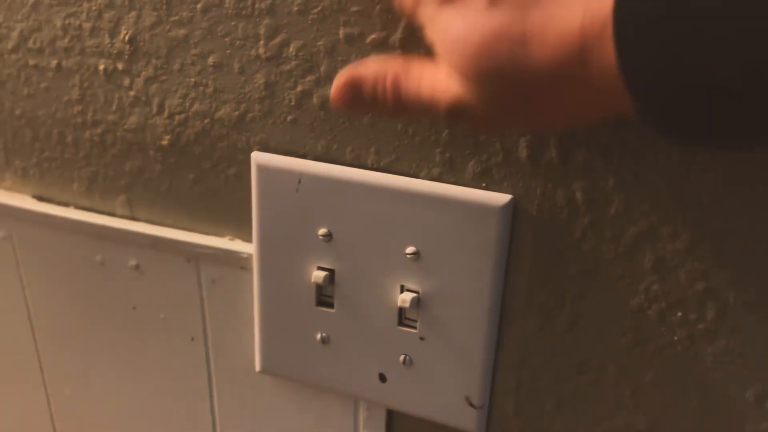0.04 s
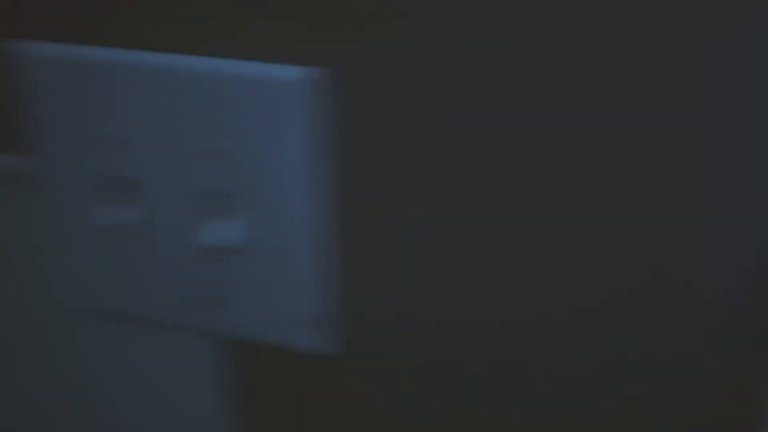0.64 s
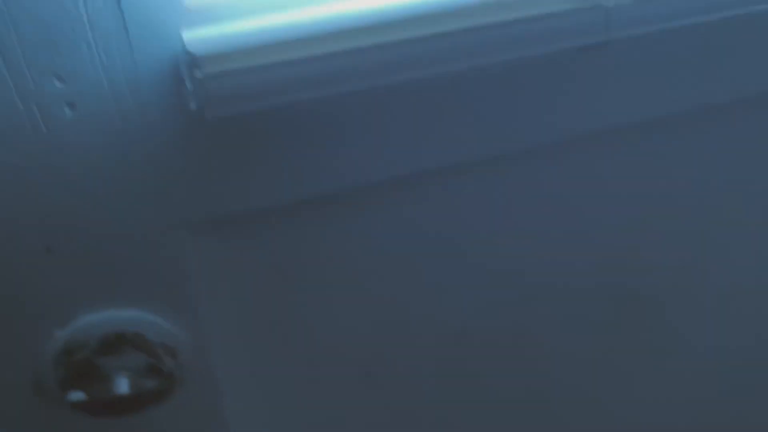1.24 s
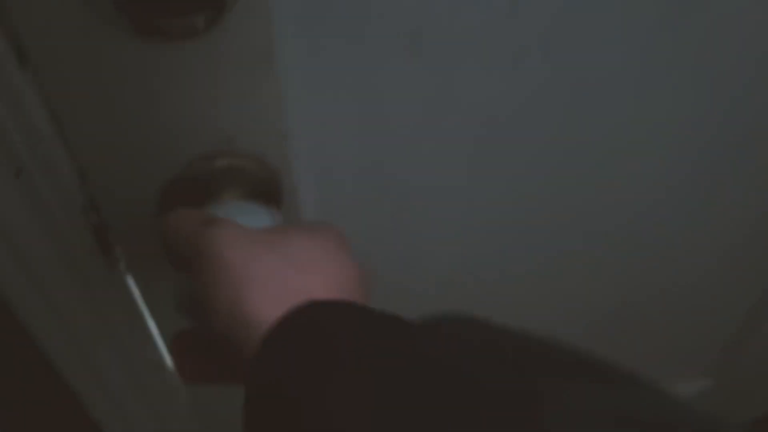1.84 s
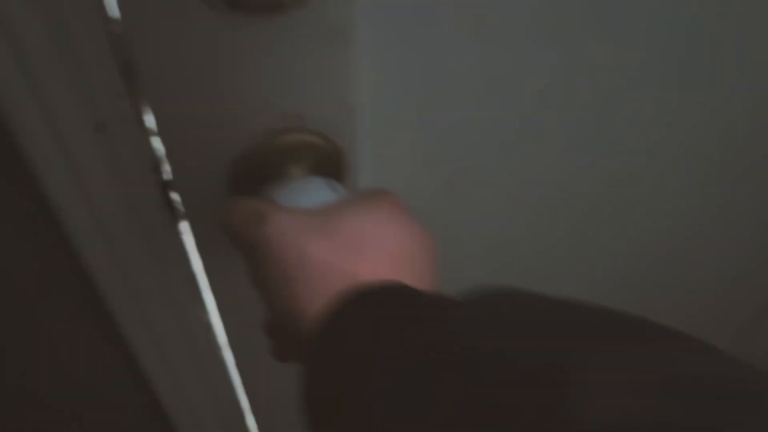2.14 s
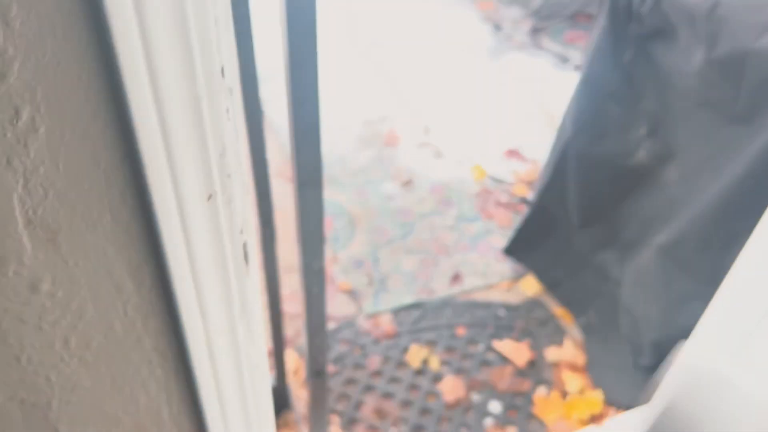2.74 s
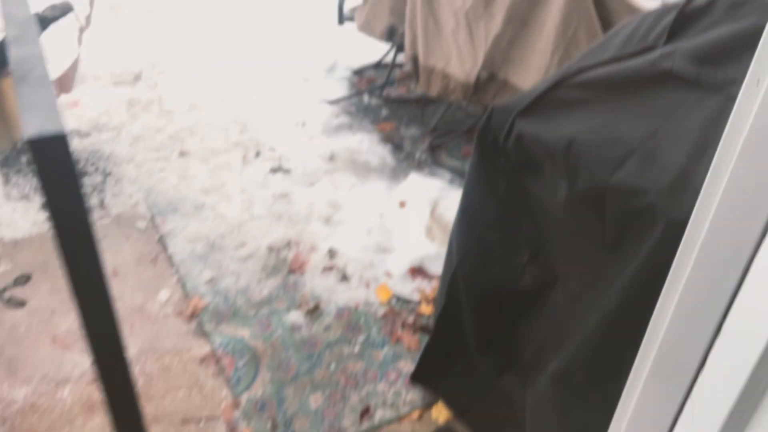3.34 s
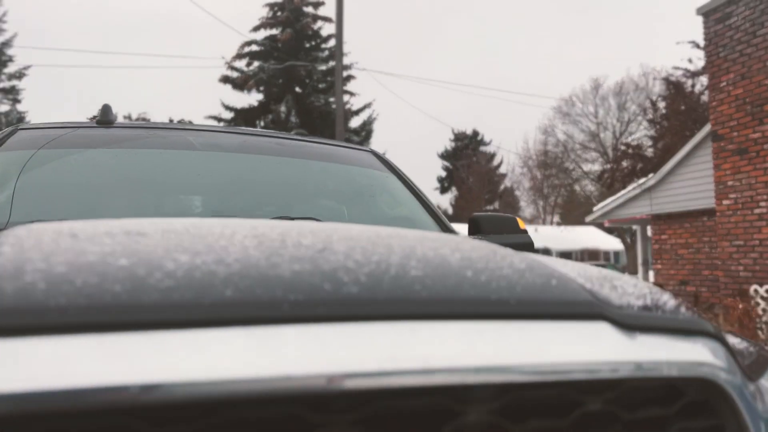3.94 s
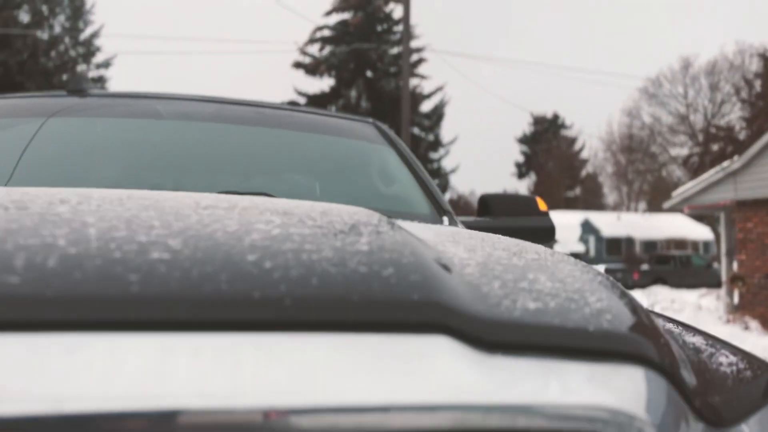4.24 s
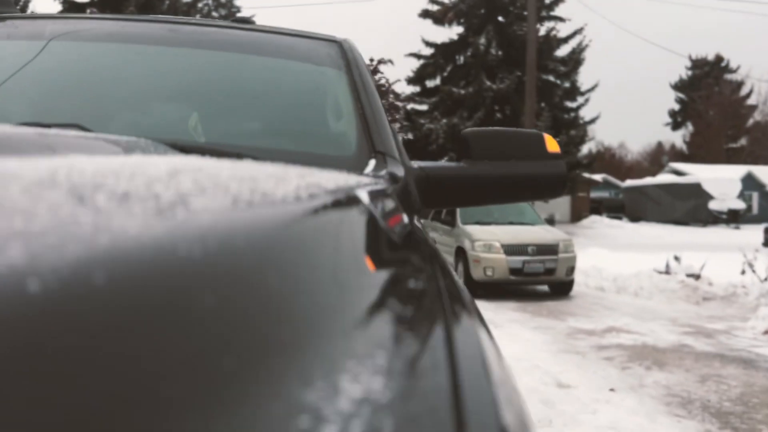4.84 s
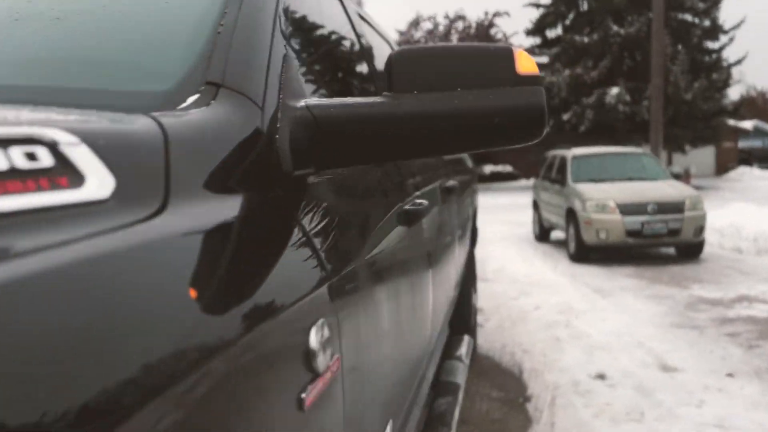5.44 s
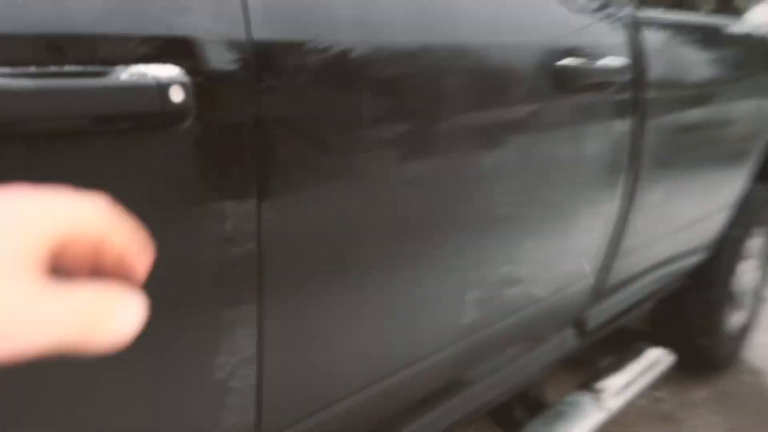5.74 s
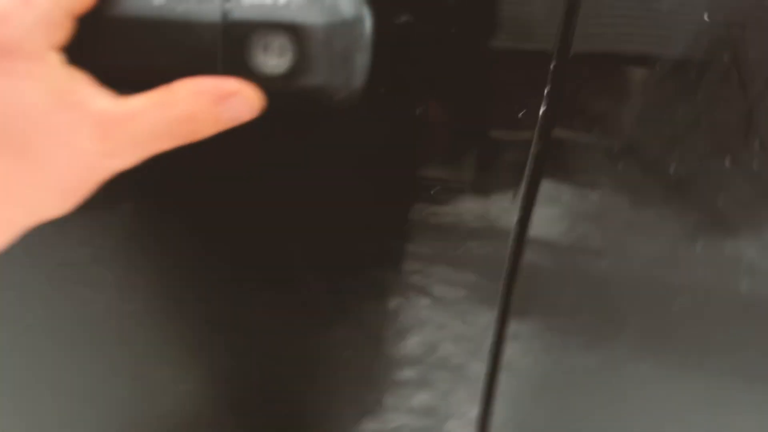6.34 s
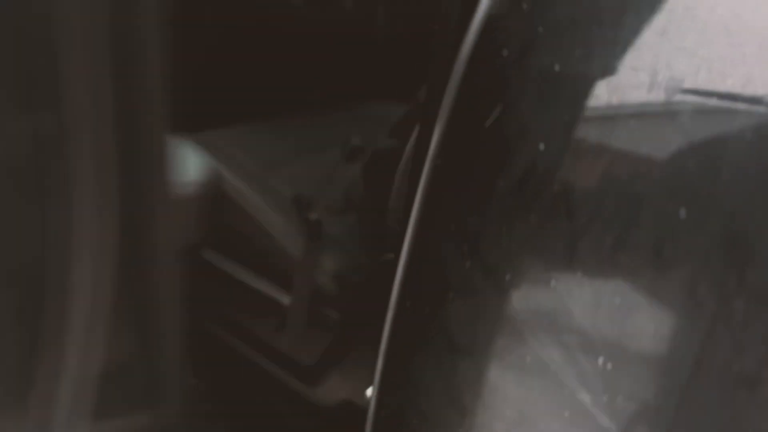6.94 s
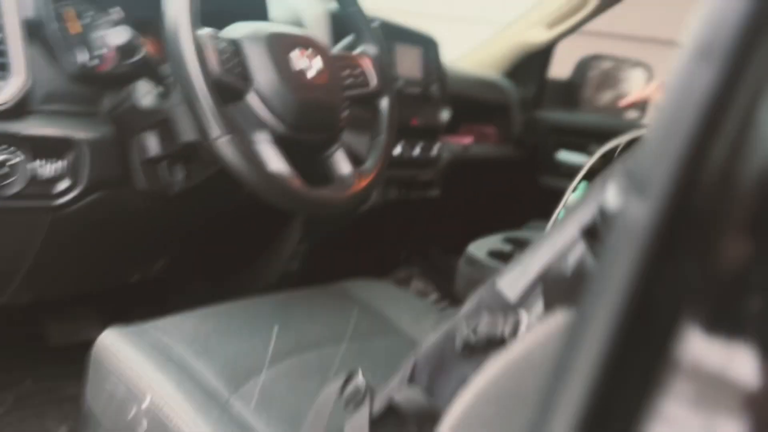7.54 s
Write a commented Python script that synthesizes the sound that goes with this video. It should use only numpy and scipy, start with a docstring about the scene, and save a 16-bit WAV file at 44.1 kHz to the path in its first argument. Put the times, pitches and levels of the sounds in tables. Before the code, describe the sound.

Sharp switch clicks, a few steps and a door unlocking indoors, followed by an idling truck engine outside and its cab door opening.

```python
"""In a hallway, a hand sweeps down the wall and flicks the light switches. After a few steps a deadbolt
snaps back, the knob turns and the door opens on a pickup idling in the yard. We jump to the truck's
grille, then move along its side to the cab door, whose handle is pulled. The V8 engine hums at multiples
of its turning speed, knocks each time a cylinder fires and blows fan noise. Each click is a short crack
plus the ringing of the part that was hit, and each rub is a swell of grainy noise."""
import sys
import numpy as np
from scipy import signal
from scipy.fft import rfft, irfft, next_fast_len
from scipy.io import wavfile
from scipy.ndimage import uniform_filter1d

SR = 44100
rng = np.random.default_rng(int(sys.argv[2]) if len(sys.argv) > 2 else 0)


def generate_wav(signal):
    """Clip the signal to [-1, 1] and save it as 16-bit WAV at the path in sys.argv[1]."""
    frames = np.transpose(np.atleast_2d(signal))
    scaled = np.clip(frames, -1, 1) * 32767
    pcm = np.round(scaled).astype(np.int16)
    wavfile.write(sys.argv[1], SR, pcm)


N = 335160
T = np.arange(N) / SR

CRANK_HZ = 12.51  # turns of the engine's crankshaft each second
JUMP_S = 3.707  # we jump from the doorway to the grille
CAB_SWING_S, CAB_SWING_WIDTH_S = 6.84, 0.39  # the cab door swings past us

# The exhaust's low hum, with a base level at each place: cycles_per_turn, house_db, grille_db, cab_db
EXHAUST_HUM = [(4, -52, -38, -52), (6, -68, -54, -66), (8, -57.5, -42, -44.5), (10, -55, -40, -51),
               (12, -66, -41.5, -57), (14, -74, -46.5, -59), (16, -75, -49, -59), (18, -80, -55, -64)]
# Tones of the engine block and whine of belt-driven parts: cycles_per_turn, house_db, grille_db, cab_db
BLOCK_TONES = [(22, -86, -50.5, -66), (32, -86, -49.5, -62), (36, -73, -51, -69), (44, -67, -52.5, -52.5),
               (48, -70, -58, -63), (52, -77, -51, -61), (54, -79, -54, -71), (58, -81, -52, -64),
               (64, -75, -50, -57), (68, -80, -51.5, -58), (72, -78, -54, -63), (76, -86, -56.5, -63),
               (82, -78, -63, -59.5), (96, -84, -58, -67), (144, -80, -59, -63), (192, -83, -62.5, -68)]
# The tone colour of fan, belt and valve noise at each place: pitch_hz, house_db, grille_db, cab_db
ENGINE_NOISE_COLOUR = [(70, -99, -58.5, -63), (140, -73, -58, -58), (226, -98, -66.5, -67.5),
                       (370, -87.5, -68, -76), (520, -88, -68.5, -71), (670, -92, -68, -78),
                       (1120, -90.5, -71, -75.5), (1424, -94, -75, -80.5), (1870, -101, -81, -86),
                       (3770, -104, -84.5, -88.5), (5300, -106, -86.5, -92.5), (6900, -113, -94.5, -99),
                       (8620, -112, -89.5, -96.5), (8880, -115, -96, -102), (15900, -126, -108, -110.5)]
# Whistles of injectors, pulleys and air intake: pitch_hz, width_hz, grille_gain_db, cab_gain_db
ENGINE_WHISTLES = [(545, 40, -2, 4), (2403, 55, 5.5, 3.5), (2990, 55, 2, 2.5), (4200, 120, 5, -1),
                   (4850, 55, 2, -4), (5400, 350, -1, -3), (7970, 400, -1, -.5), (8770, 150, 2.5, 1.5)]
# Parts of the engine sound that swell or dip as we walk: time_s, half_width_s, low_hz, high_hz, gain_db
BODYWORK_SWELLS = [(4.0, 0.4, 640, 870, 0), (4.33, 0.24, 1380, 2090, 2), (4.6, 0.16, 770, 808, 5),
                   (5.5, 0.1, 3470, 5200, 4), (5.75, 0.088, 33.8, 77, -13), (5.8, 0.35, 243, 458, -4.5),
                   (6.27, 0.31, 925, 1320, 4)]

# Clicks of the light switches: start_s, level_db, brightness_db_per_octave
SWITCH_CLICKS = [(.2055, -31.5, 6), (.2365, -24, -1.5), (.2415, -32, -1.5), (.249, -33, -6),
                 (.279, -37.5, 11)]
# The notes a switch rings with (ring_s is the time to fade by 60 dB): pitch_hz, gain_db, ring_s
SWITCH_NOTES = [(1050, -1.5, 0.059), (1400, -2, 0.13), (1507, -5, 0.15), (3490, 19, 0.011), (4440, -3, .02),
                (4920, -18, 0.062), (5660, -23, .05), (9100, -11, .06)]
# Clacks of the deadbolt: start_s, level_db
BOLT_CLACKS = [(1.083, -25), (1.085, -18), (1.0925, -22), (1.118, -30), (1.1225, -32), (1.1265, -26.5),
               (1.197, -27.5), (1.246, -40)]
# The notes the deadbolt rings with: pitch_hz, gain_db, ring_s
BOLT_NOTES = [(440, -17, .06), (1530, -4, .03), (1730, 1, .036), (1880, 4, .034), (2080, 2, .042),
              (2920, -2, .028), (3650, -2, .013), (3900, 2.5, .013), (4230, -5, .013), (5040, -5, .014),
              (6450, -7, .015), (8570, -6, .018)]
# The ping of the small lever that turns the deadbolt: start_s, level_db, brightness_db_per_octave
LEVER_PINGS = [(1.3933, -46.5, -1)]
# The notes that lever rings with: pitch_hz, gain_db, ring_s
LEVER_NOTES = [(1464, 0, .07), (2853, -1, .06), (3800, -12, .03), (8694, -12, .06)]
# Clicks of the house door's latch: start_s, level_db, brightness_db_per_octave
LATCH_CLICKS = [(2.3008, -22.5, 0.012), (2.3412, -31, -0.023)]
# The notes the latch rings with: pitch_hz, gain_db, ring_s
LATCH_NOTES = [(1330, 2.5, 0.019), (1430, 1.5, 0.024), (1700, -15, 0.1), (2700, -11, 0.03),
               (3380, -12, 0.045), (4140, -5, 0.018), (4680, -2, 0.025), (5270, 10, 0.0078),
               (5520, -2, 0.021), (10560, -0.5, 0.007), (11900, -6, .012)]
# Single clicks of the knob and door: start_s, level_db, brightness_db_per_octave
KNOB_CLICKS = [(1.6655, -35, -2), (1.776, -38.5, -1), (1.8767, -40, -2), (2.0445, -48, -2.5),
               (2.1716, -39.5, 0), (2.25, -37.5, -3.5), (2.283, -36, 11), (2.396, -32, 4),
               (2.403, -32.5, 1), (2.6006, -40.5, -2.5), (2.6345, -38, 4.5), (2.641, -36, -1.5),
               (2.778, -48, -2)]
# Quick runs of ticks from the knob: start_s, end_s, ticks_per_s, level_db, brightness_db_per_octave
KNOB_RUNS = [(1.782, 1.815, 164, -44.5, -5.5), (1.883, 2.0, 106, -51, -3.5),
             (2.407, 2.45, 120, -46.5, -2.5)]
# The notes the knob rings with: pitch_hz, gain_db, ring_s
KNOB_NOTES = [(290, -1.5, 0.024), (460, -2, 0.06), (664, -5, 0.036), (943, -4.5, 0.044), (1500, 0, 0.025),
              (1900, 5, 0.03), (2740, -3, 0.018), (3450, 1, 0.016), (4400, -4, 0.016), (6400, 2, 0.018),
              (7300, 2, .018), (9300, -1, .02)]
# Clunks of the cab door's handle: start_s, level_db, brightness_db_per_octave
HANDLE_CLUNKS = [(6.027, -50, 9), (6.630, -32, -5.5), (6.639, -29.5, -9), (6.6647, -22, -3),
                 (6.671, -22, -4), (6.679, -25, -8), (6.685, -20, -16), (6.739, -29.5, -7.5),
                 (6.746, -28.5, -9.5)]
# The notes the cab door rings with: pitch_hz, gain_db, ring_s
CAB_DOOR_NOTES = [(271, -2, 0.04), (400, -6, 0.03), (580, 6, 0.018), (850, 8, 0.014), (1080, 3, .02),
                  (1350, 1, 0.03), (2283, 2, 0.04), (2982, -3, 0.03), (3520, 3, .035), (4764, 4, 0.035),
                  (5480, 9, 0.026), (5730, 7, .024)]
# Dull thuds of the wall, doors and feet: start_s, level_db, pitch_hz, ring_s
DULL_THUDS = [(0.203, -29, 127.6, 0.33), (.238, -26, 152, 0.14), (0.241, -40.5, 272, 0.19),
              (1.227, -37, 152, 0.15), (1.235, -41, 72, 0.22), (1.921, -42.5, 105, 0.2),
              (2.231, -41, 70, 0.15), (2.299, -36, 342, 0.063), (2.401, -39, 42, .3),
              (2.53, -35, 56.4, 0.077), (3.611, -36.5, 190, 0.086), (6.661, -16.5, 97, 0.083),
              (6.683, -26.5, 316, 0.15), (6.685, -24, 138, 0.22), (6.739, -32, 336, 0.062),
              (6.774, -31, 71, 0.17), (7.2, -34.5, 231, 0.18), (7.223, -34, 72, 0.13),
              (7.276, -34, 98, 0.086)]
# Boots touching the floor: start_s, level_db
FOOTFALLS = [(0.476, -57), (0.502, -50), (0.5404, -40), (0.625, -39.5), (0.636, -40.5), (.815, -52),
             (0.848, -35.5), (0.9287, -34.5), (1.026, -35)]
# The notes the floor rings with: pitch_hz, gain_db, ring_s
FLOOR_NOTES = [(430, -9, 0.019), (883, -1, 0.017), (1080, -3, 0.011), (1650, -1, .01), (3300, -2, 0.007),
               (4700, -2, 0.007)]
# Runs of soft pats on the house door: start_s, end_s, pats_per_s, level_db, brightness_db_per_octave
PAT_RUNS = [(1.3, 1.58, 30, -53, -16), (1.71, 1.76, 63, -48.5, -11)]
# The notes the wooden door rings with: pitch_hz, gain_db, ring_s
WOOD_NOTES = [(425, -3.5, 0.039), (930, 7, 0.038), (1140, -8, .02), (3300, -8, .008)]
# Hand, sleeve, knob, boots, cab handle and door seals rubbing:
# peak_s, rise_s, fall_s, level_db, centre_hz, spread_ratio (top of the noise band over its centre)
RUB_STROKES = [(.12, 0.18, 0.022, -51, 7440, 5.6), (.203, 0.037, 0.046, -39.5, 4170, 2),
               (1.27, 0.15, 0.39, -64, 1630, 1.6), (1.48, 0.098, 0.13, -71, 7650, 1.34),
               (1.55, .25, 0.26, -65.5, 520, 1.3), (1.785, 0.0082, 0.042, -52, 2970, 1.9),
               (1.90, 0.023, 0.057, -67, 6600, 1.1), (2.10, 0.022, 0.041, -53.5, 5170, 1.17),
               (2.28, 0.037, 0.094, -52.5, 3530, 1.4), (2.405, 0.0073, 0.056, -58, 1800, 1.9),
               (2.42, 0.079, 0.072, -49, 616, 1.7), (2.64, 0.055, 0.059, -54, 1850, 1.2),
               (5.633, .001, 0.0044, -42, 1800, 1.2), (6.255, 0.04, 0.025, -58, 7000, 1.9),
               (6.742, 0.016, .014, -54, 5500, 1.5), (6.95, 0.78, 0.1, -55, 4300, 1.3)]
# Squeaks of the house door's rubber seal: start_s, length_s, level_db, start_hz, end_hz
SEAL_SQUEAKS = [(2.543, 0.033, -58, 1700, 2810), (2.592, 0.036, -55.5, 3300, 4700),
                (2.679, .045, -60, 2700, 1950)]
# The tone colour of the crack when two hard things meet: pitch_hz, gain_db
CRACK_COLOUR = [(100, 11), (400, 1.5), (1000, -1), (2000, 3), (5200, 7.5), (6500, 1), (10000, -4),
                (15500, -8)]

# The tone colour of the hallway's echo: pitch_hz, gain_db
ECHO_COLOUR = [(100, -6), (400, -1), (900, 1), (2000, -1), (4800, -1), (6000, -6), (15000, -9)]
# The puff of air from each opening door: peak_s, half_width_s, gain_db
DOOR_DRAUGHTS = [(2.45, 0.14, 12), (7.16, 0.25, 15.5)]
# The faint, steady hush behind everything: pitch_hz, level_db_per_hz
HUSH_COLOUR = [(78, -97.5), (190, -84.5), (350, -100), (1500, -108), (5000, -116), (15000, -130)]


def engine():
    """The idling V8, heard from the house, then at the grille, then beside the cab."""
    turns = np.cumsum(CRANK_HZ * (1 + 0.00119 * wander(5))) / SR  # the speed wavers a little
    house_boom_db, house_upper_db = through_house_door()
    side, yard_boom_db, yard_upper_db, treble_db = round_the_truck()
    outside = np.clip((T - JUMP_S) / 0.004, 0, 1)
    places = np.array([1 - outside, outside * (1 - side), outside * side])  # house, grille, cab
    boom_gain = undb(np.where(T < JUMP_S, house_boom_db, yard_boom_db))
    upper_gain = undb(np.where(T < JUMP_S, house_upper_db, yard_upper_db))
    tones = engine_tones(turns, places, boom_gain, upper_gain)
    noise = engine_noise(turns, places, side, outside * treble_db)
    return tones + upper_gain * noise


def engine_tones(turns, places, boom_gain, upper_gain, lead_turns=0.13, smear=0.075, belt_slip=0.0007):
    """The exhaust and the engine block hum at whole multiples of the turning speed."""
    # the open cab door screens off the block's tones
    block_gain = upper_gain * undb(-6 * ease(CAB_SWING_S, CAB_SWING_WIDTH_S / 2))
    out = np.zeros(N)
    for cycles, *place_db in EXHAUST_HUM + BLOCK_TONES:
        # the exhaust pipe smears each pulse, so higher tones arrive later
        phase = 2 * np.pi * cycles * (turns + lead_turns) - smear * cycles ** 2
        phase += belt_slip * cycles * wander(43)  # the highest waver most as the belt slips
        flutter = undb((0.86 + cycles / 80) * wander(8.3))
        tone = np.sqrt(2) * np.sin(phase) * flutter
        gain = boom_gain if cycles < 10 else upper_gain if cycles < 20 else block_gain
        out += tone * (undb(place_db) @ places) * gain
    return out


def engine_noise(turns, places, side, treble_db, split_hz=1900):
    """Knocks, fan noise, valve hiss and whistles blend into a rush that sounds different at each place."""
    knocks = undb(-1) * band(cylinder_knocks(turns), split_hz, "low", order=1)
    knocks = band(knocks, 260, "high")
    fan = undb(-6) * band(rng.standard_normal(N), split_hz, "low", order=1)
    chug = np.sin(4 * np.pi * turns)  # the two rows of cylinders fire unevenly: two chugs a turn
    source = (1 + 0.1 * chug) * (knocks + fan) + valve_hiss(turns, split_hz) + whistles(side)
    source = engine_bay_echoes(band(source, 34, "high") * np.sqrt(SR / 2))
    hz, *place_colours = np.transpose(ENGINE_NOISE_COLOUR)
    rush = sum(share * colour(source, np.c_[hz, db]) for share, db in zip(places, place_colours))
    rush += 0.25 * band(rush, [100, 220], "band", order=1) * chug  # the exhaust's rumble throbs
    treble = colour(rush, [(900, -20), (1800, 1.5), (3000, 4.0)])
    # once open, the cab booms with the engine's noise
    cab_boom = undb(-5) * band(rush, [210, 340], "band", order=1) * ease(CAB_SWING_S, CAB_SWING_WIDTH_S)
    return rush + cab_boom + treble * (undb(treble_db) - 1)


def cylinder_knocks(turns, scatter_db=1.0, jitter_s=0.00008):
    """Four firings a turn knock on the block. One row of cylinders is louder, and no two sound alike."""
    firings = np.flatnonzero(np.diff(np.floor(4 * turns)))
    chance = rng.standard_normal((len(firings), 2))
    out, t = np.zeros(N), T[:SR // 10]
    rows, cylinders = rng.standard_normal((2, len(t))), rng.standard_normal((8, len(t)))
    envelope = fade(t, 0.07) * (1 - np.exp(-t / 0.003))
    for k, (sample, (late, size)) in enumerate(zip(firings, chance)):
        knock = 0.7 * rows[k % 2] + 0.7 * cylinders[k % 8] + 0.75 * rng.standard_normal(len(t))
        gain = undb(scatter_db * size - 3 * (k % 2))
        add(out, sample / SR + jitter_s * late, gain * knock * envelope)
    return unit(out)


def valve_hiss(turns, low_hz):
    """Valves and injectors hiss, pulsing with each firing."""
    hiss = band(rng.standard_normal(N), low_hz, "high", order=1)
    pulse = 1 + 0.15 * np.cos(8 * np.pi * turns)
    return undb(-1 + 0.7 * wander(30)) * hiss * pulse


def whistles(side):
    """Injectors, pulleys and air intake whistle in narrow bands of noise, each fading up and down."""
    out = np.zeros(N)
    for hz, width_hz, grille_db, cab_db in ENGINE_WHISTLES:
        whistle = band(rng.standard_normal(N), [hz - width_hz / 2, hz + width_hz / 2], "band", order=1)
        out += whistle * undb(grille_db + (cab_db - grille_db) * side + 2 * wander(6))
    return out


def engine_bay_echoes(x):
    """Echoes between the panels around the engine make some high pitches louder and others softer."""
    hz = np.arange(1200, 16000, 60)
    ripple_db = np.r_[0, rng.standard_normal(len(hz) - 1)]
    return colour(x, np.c_[hz, ripple_db])


def through_house_door(reached_s=0.97, opens_s=2.22):
    """Gains in dB for the engine's low boom and the rest: both rise as the door opens and we step out."""
    far = 1 - ease(reached_s, 0.045)
    shut = 1 - ease(opens_s, 0.029)
    doorway_db = 5 * np.exp(-np.abs(T - JUMP_S) / 0.3)
    boom_db = 0.5 * far - 7.5 * shut + doorway_db
    upper_db = -2 - 8 * far - 7 * shut + doorway_db
    return boom_db, upper_db


def round_the_truck(corner_s=4.68, fender_s=4.78):
    """The grille beams noise forwards; the fender and the swinging cab door each block some boom."""
    side = 0.95 * ease(corner_s, 0.06)  # how much we hear of the side sound, from 0 to 1
    beam_db = 2 * np.exp(-np.abs(T - JUMP_S) / 0.24)
    fender = passing(fender_s, 0.32)
    boom_db = 1.5 * side - 8.5 * fender - 9 * passing(CAB_SWING_S, CAB_SWING_WIDTH_S)
    upper_db = beam_db - 1.5 * fender + ease(CAB_SWING_S, CAB_SWING_WIDTH_S)
    treble_db = beam_db - 2 * fender
    return side, boom_db, upper_db, treble_db


def along_bodywork(x):
    """The engine's tone colour shifts as we pass the grille, the fender and the door panel."""
    for s, width_s, low_hz, high_hz, db in BODYWORK_SWELLS:
        x = x + band(x, [low_hz, high_hz], "band", order=1) * (undb(db * passing(s, width_s)) - 1)
    return x


def light_switches():
    """The switches snap over with sharp clicks."""
    return strikes(SWITCH_CLICKS, SWITCH_NOTES, crack_db=-4, crack_s=0.042)


def deadbolt():
    """The bolt snaps back in a string of clacks; the harder the clack, the brighter it is."""
    clacks = [(s, db, 0.19 * (db + 21)) for s, db in BOLT_CLACKS]
    return band(strikes(clacks, BOLT_NOTES, crack_db=0, crack_s=0.018, detune=0.04), 500, "high", order=1)


def bolt_lever():
    """The deadbolt's lever pings as the fingers let go."""
    return strikes(LEVER_PINGS, LEVER_NOTES, crack_db=-4, crack_s=0.011)


def door_latch():
    """The latch clicks twice as the house door comes free."""
    return strikes(LATCH_CLICKS, LATCH_NOTES, crack_db=-5.5, crack_s=0.017, detune=0.019)


def door_knob():
    """The knob rattles when gripped, ticks as it turns and rattles again as the door comes free."""
    return strikes(KNOB_CLICKS + flurries(KNOB_RUNS), KNOB_NOTES, crack_db=6, crack_s=0.016, detune=0.05)


def cab_handle():
    """The pulled handle clunks and makes the cab door ring."""
    return strikes(HANDLE_CLUNKS, CAB_DOOR_NOTES, crack_db=-1.5, crack_s=0.055)


def thuds(rattle_db=-13):
    """Bumped panels give way and swing back and forth briefly, with a little low rattle."""
    out, t = np.zeros(N), T[:SR // 3]
    for s, db, hz, ring_s in DULL_THUDS:
        rattle = undb(rattle_db) * unit(band(rng.standard_normal(len(t)), 3 * hz, "low"))
        envelope = fade(t, ring_s) * (1 - np.exp(-t / 0.00068))
        add(out, s, undb(db) * (np.sin(2 * np.pi * hz * t) + rattle) * envelope)
    return out


def footsteps(brightness_db_per_octave=-2.5):
    """Boots knock on the floor, which rings very briefly."""
    hits = [(s, db, brightness_db_per_octave) for s, db in FOOTFALLS]
    return strikes(hits, FLOOR_NOTES, crack_db=3, crack_s=0.014, detune=0.1)


def door_pats():
    """Hand and sleeve pat the wooden door on the way to the knob."""
    return strikes(flurries(PAT_RUNS), WOOD_NOTES, crack_db=5.5, crack_s=0.022, detune=0.11)


def rubs(grain_db=2.1):
    """Skin, sleeve, soles and door seals slide in tiny slips that swell and die away."""
    out = np.zeros(N)
    slips = rng.standard_normal(N) * undb(grain_db * np.repeat(rng.standard_normal(N // 40 + 1), 40)[:N])
    # the sole scuffs just after each footfall
    scuffs = [(s + 0.028, 0.02, 0.02, db - 17.5, 2900, 1.3) for s, db in FOOTFALLS]
    for s, rise_s, fall_s, db, hz, spread in RUB_STROKES + scuffs:
        swell = np.exp(-np.where(T < s, (s - T) / rise_s, (T - s) / fall_s) ** 1.14)
        out += undb(db) * swell * unit(band(slips, [hz / spread, hz * spread], "band", order=1))
    return out


def seal_squeaks():
    """The rubber seal sticks and lets go in short, rough slides of pitch."""
    out = np.zeros(N)
    for s, length_s, db, start_hz, end_hz in SEAL_SQUEAKS:
        progress = np.linspace(0, 1, int(length_s * SR))
        slip = unit(band(rng.standard_normal(len(progress)), 560, "low"))
        hz = (start_hz + (end_hz - start_hz) * progress) * (1 + 0.08 * slip)
        add(out, s, 2 * undb(db) * np.sin(np.pi * progress) * np.sin(2 * np.pi * np.cumsum(hz) / SR))
    return out


def hallway(ring_s=0.29):
    """The small sounds plus their echo off the walls; the steps are further off, so they echo more."""
    switches, bolt, latch = light_switches(), deadbolt(), door_latch()
    door = door_knob() + door_pats()
    steps = footsteps()
    handling = door + bolt_lever() + rubs() + seal_squeaks()
    to_walls = undb(-16) * switches + undb(-15) * (bolt + latch) + undb(-12) * handling + undb(-10) * steps
    t = T[:SR]
    tail = colour(rng.standard_normal(SR), ECHO_COLOUR) * fade(t, ring_s) * (1 - np.exp(-(t / 0.0025) ** 2))
    echo = signal.fftconvolve(to_walls, tail / np.sqrt(np.sum(tail ** 2)))[:N]
    return switches + bolt + latch + handling + steps + echo


def air(indoor_db=-48.5, outdoor_db=-42):
    """A faint hush, and air buffeting us as we move: stronger outdoors and when a door swings."""
    draught_db = sum(db * passing(s, width_s) for s, width_s, db in DOOR_DRAUGHTS)
    level_db = np.where(T < JUMP_S, indoor_db, outdoor_db) + draught_db
    buffet = unit(band(rng.standard_normal(N), [6, 18], "band", order=3)) * undb(level_db)
    return buffet + colour(rng.standard_normal(N), HUSH_COLOUR) * np.sqrt(SR / 2)


def strikes(hits, notes, crack_db, crack_s, detune=0.0062):
    """Each hit makes a short crack and sets the part's notes ringing, never twice quite alike."""
    out, t = np.zeros(N), T[:SR // 4]
    hz, db, ring_s = np.transpose(notes)[:, :, None]
    for s, level_db, brightness in hits:
        size, pitch_shift, phase = rng.standard_normal((3, len(notes), 1))
        waves = np.sin(2 * np.pi * (hz * (1 + detune * pitch_shift) * t + phase))
        ring = (undb(db + 2 * size) * fade(t, ring_s) * waves).sum(0)
        crack = unit(colour(rng.standard_normal(len(t)), CRACK_COLOUR)) * fade(t, crack_s)
        hit = ring / np.sqrt(np.sum(undb(db) ** 2) / 2) + undb(crack_db) * crack
        hit = np.pad(hit * (1 - np.exp(-t / 0.0003)), (64, 0))
        hit = colour(hit, [(500, 0), (16000, 5 * brightness)])[64:]  # tilt the top five octaves
        peak = np.sqrt(uniform_filter1d(hit ** 2, size=88).max())  # the loudest 2 ms
        add(out, s, hit * undb(level_db) / peak)
    return out


def flurries(runs, scatter_db=2, unevenness=0.6):
    """Turn each run into small hits, uneven in spacing, strength and brightness."""
    hits = []
    for start_s, end_s, rate, db, brightness in runs:
        times = np.arange(start_s, end_s, 1 / rate)
        for s, (late, size, shine) in zip(times, rng.standard_normal((32, 3))):
            delay_s = unevenness * abs(late) / rate / 2
            hits.append((s + delay_s, db + scatter_db * size, brightness + 2 * shine))
    return hits


def undb(db):
    """Turn decibels into a number to multiply by."""
    return 10 ** (np.asarray(db) / 20)


def unit(x):
    """Scale a sound so its average power is 1."""
    return x / np.sqrt(np.mean(x ** 2))


def colour(x, points):
    """Turn pitches up or down along a curve of (pitch_hz, gain_db) points."""
    hz, db = np.transpose(points)
    size = next_fast_len(len(x))
    bin_hz = np.maximum(np.fft.rfftfreq(size, 1 / SR), 1)
    gain = undb(np.interp(np.log(bin_hz), np.log(hz), db))
    return irfft(rfft(x, size) * gain, size)[:len(x)]


def band(x, hz, kind, order=2):
    """Keep the low part, the high part or a middle band of a sound."""
    return signal.sosfilt(signal.butter(order, np.minimum(hz, SR / 2 - 1), kind, fs=SR, output="sos"), x)


def wander(changes_per_s):
    """A random drift around 0, typically about 1 in size."""
    points = rng.standard_normal(512)
    return 1.2 * np.interp(T * changes_per_s, np.arange(len(points)), points)


def fade(t, ring_s):
    """Die away by 60 dB in ring_s seconds."""
    return np.exp(-np.log(1000) * t / ring_s)


def ease(s, slowness_s):
    """A smooth change from 0 to 1, half done at time s."""
    return (1 + np.tanh((T - s) / (2 * slowness_s))) / 2


def passing(s, half_width_s):
    """A smooth swell from 0 up to 1 at time s and back."""
    return np.exp(-((T - s) / half_width_s) ** 2)


def add(out, s, x):
    """Mix x into out, starting at time s."""
    i = max(int(s * SR), 0)
    out[i:i + len(x)] += x[:len(out) - i]


def scene():
    """Mix the cab handle, hallway, thuds, engine and air into one channel."""
    return (cab_handle() + hallway() + thuds() + along_bodywork(engine()) + air())[None]


def record(dry, top_hz=15800):
    """Cut off the very highest treble."""
    return signal.sosfilt(signal.ellip(10, 0.2, 80, top_hz, fs=SR, output="sos"), dry)


dry = scene()
out = record(dry)
generate_wav(out)
```